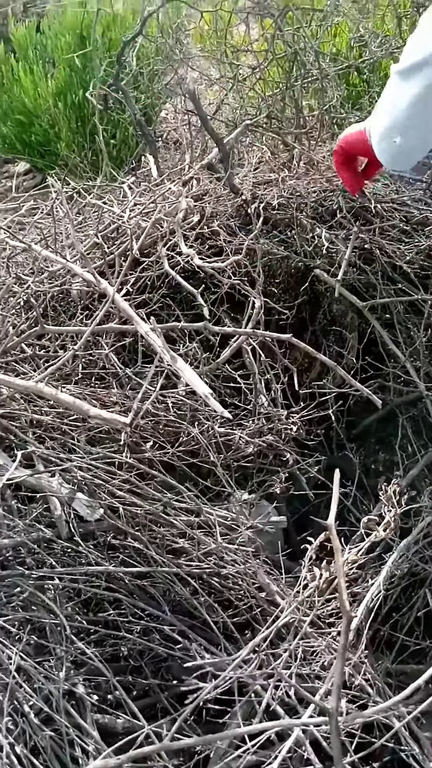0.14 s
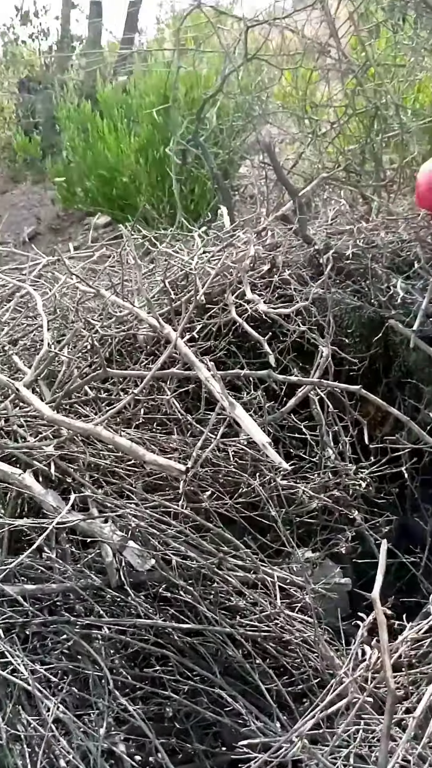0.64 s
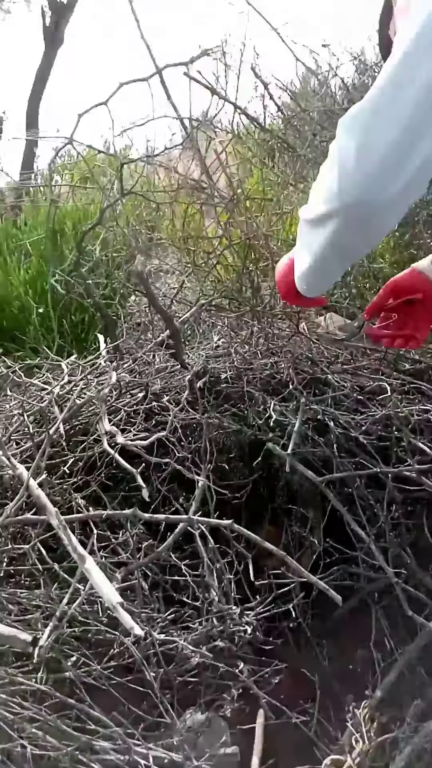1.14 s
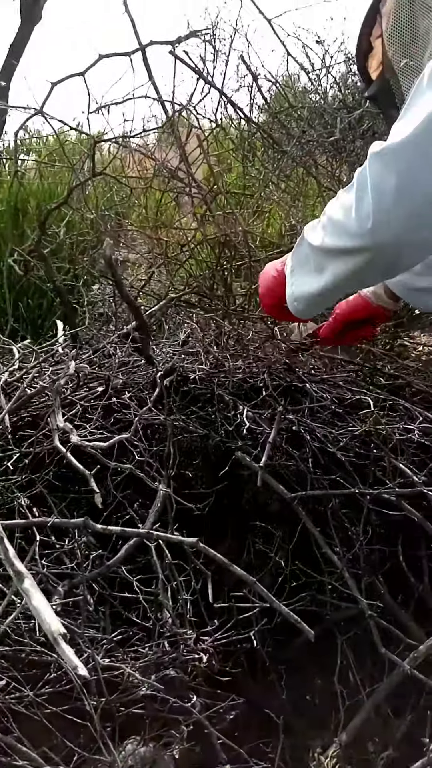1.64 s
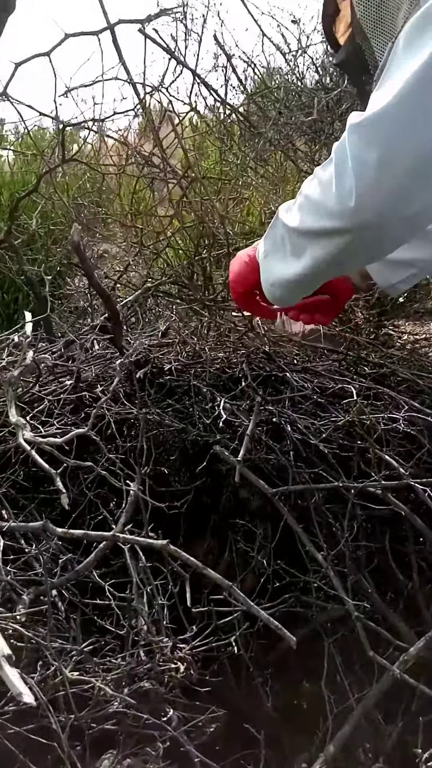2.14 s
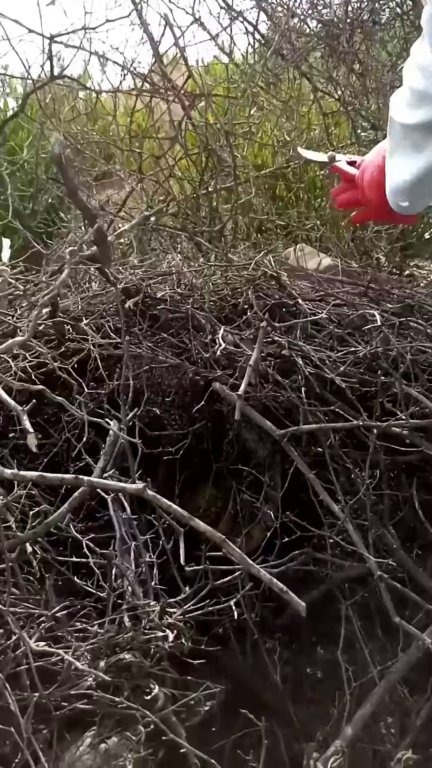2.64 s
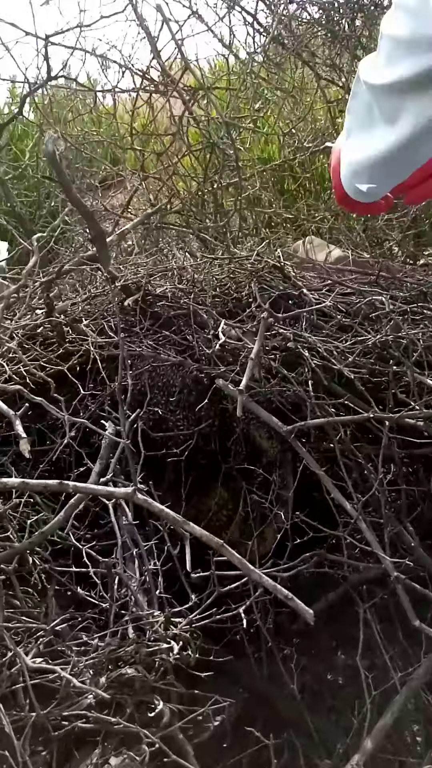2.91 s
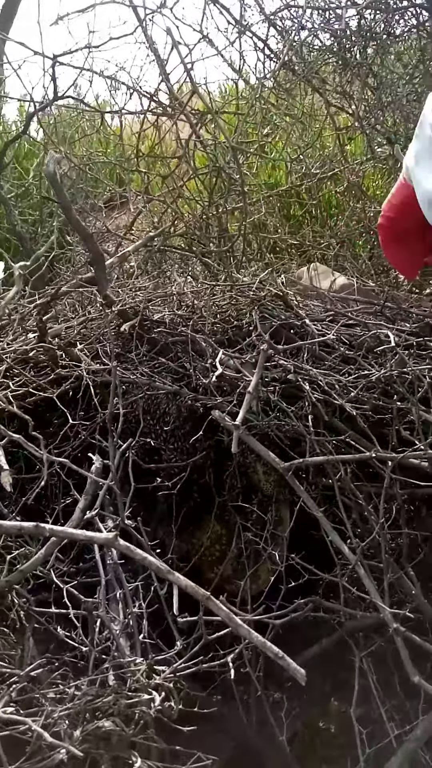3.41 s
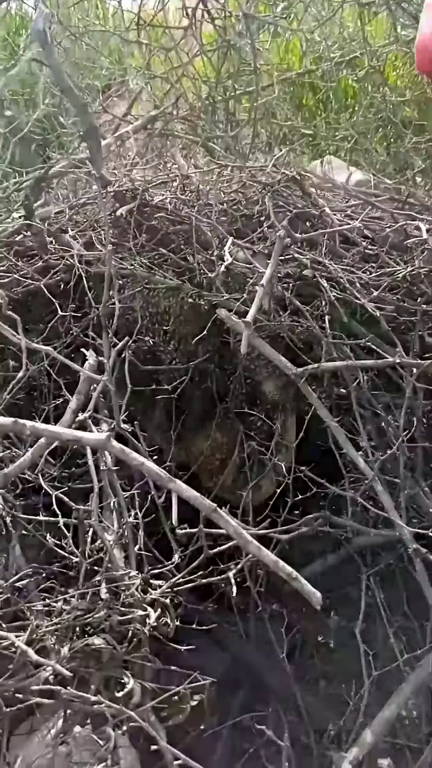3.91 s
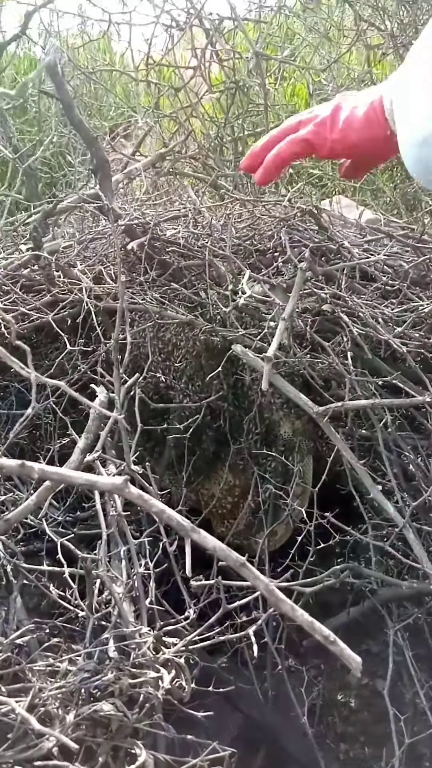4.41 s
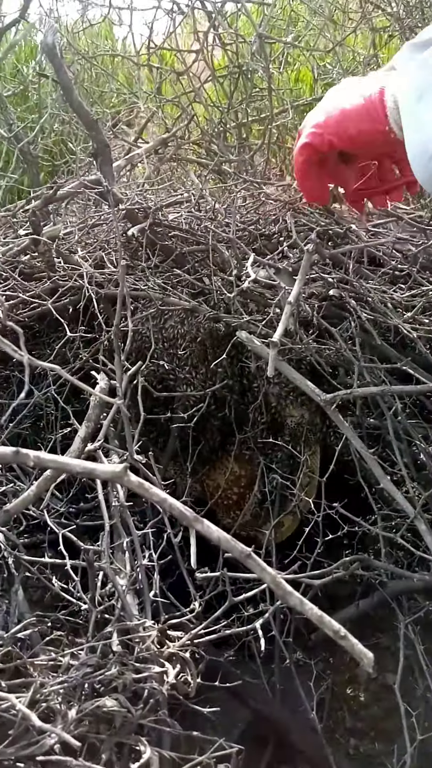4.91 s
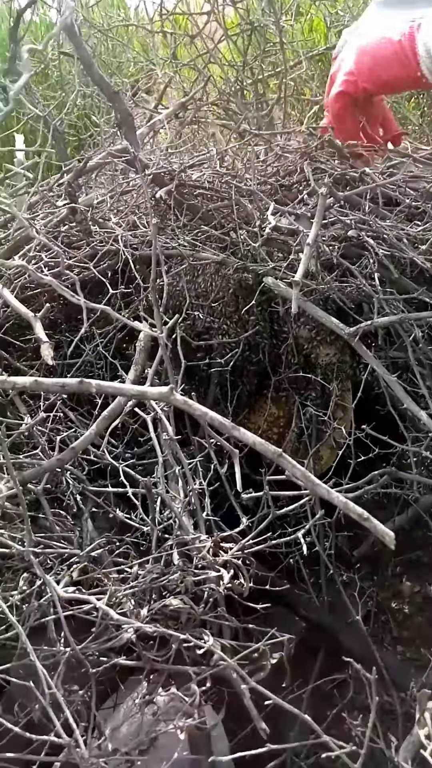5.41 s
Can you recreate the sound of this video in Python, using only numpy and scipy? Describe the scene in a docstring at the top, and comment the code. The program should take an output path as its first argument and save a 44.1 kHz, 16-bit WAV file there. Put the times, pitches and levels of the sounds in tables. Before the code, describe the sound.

Dry sticks rustle, tick and crack close up as a hand pushes through a brush pile, loud snaps clustering midway and later.

```python
"""A gloved hand pushes through a pile of dry twigs outdoors, close to a microphone, under a faint open-air hush.
First comes scraping bark and leaves (shaped noise) with small ticks, then a loose stick taps (fading sine tones).
From 1.3 s loud snaps join in, bursts of tearing-fibre noise that ring their twigs; the loudest comes near 1.57 s.
Crackling thickens after 2.2 s, strong snaps and knocks crowd together from 3.6 to 4.6 s, then all grows sparser.
The tangle scatters each snap; one overall colour lies on everything, with a steep drop near 16 kHz."""
import sys
import numpy as np
from scipy import signal
from scipy.fft import rfft, irfft
from scipy.io import wavfile
from scipy.ndimage import uniform_filter1d

SR = 44100
rng = np.random.default_rng(int(sys.argv[2]) if len(sys.argv) > 2 else 0)


def transcribe(u):
    """Save the signal u as a 16-bit wav file named by the first command-line argument.

    u: samples, shape (n,) or (channels, n), limited to [-1, 1]; the rate is SR.
    q: integer samples, one column per channel.
    """
    v = np.clip(np.atleast_2d(u).T, -1, 1)
    q = np.round(v * 32767).astype(np.int16)
    wavfile.write(sys.argv[1], SR, q)


def gain_from_decibels(decibels):
    """Convert decibel values to linear amplitude factors."""
    exponent = np.asarray(decibels, float) / 20
    return 10 ** exponent


N = 244755  # length in samples

# Open air before the overall colour, relative level: f/Hz, level/dB
AIR_COLOUR = [(25, 16.5), (70, 22), (200, 12.5), (400, 8), (800, -7.5), (1900, 8), (3200, -16.5),
              (6000, -16.5), (16000, -6)]
# The whole pile giving under the hand: start t/s, length/s, level/dB
HEAVES = [(0, 0.68, -76), (0.709, 0.14, -83), (1.39, 0.29, -77), (2.18, 0.53, -75.5), (3.453, 0.28, -69),
          (3.833, 1, -85.5)]
# A loose stick tapping faintly further off: t/s, level/dB
TAPS = [(.5, -80), (.63, -82.5), (.737, -77.5), (.953, -79.5)]
# The tones of that stick: f/Hz, level/dB added to the tap, damping per cycle
STICK_TONES = [(1316, 0, 0.12), (1880, 0, .12)]
# Thick branches knocking, each with its own ring: t/s, level/dB, f/Hz, damping per cycle
KNOCKS = [(.24, -71.5, 59, 3), (1.0878, -47.5, 500, 3), (1.3222, -48.5, 1170, 0.74), (1.568, -66, 170, 1.9),
          (1.567, -37, 1550, 0.56), (3.203, -63.5, 650, 0.52), (3.6533, -43.5, 1160, 0.39),
          (3.6668, -51, 1140, 0.35), (3.683, -61, 1210, .3), (3.8225, -52, 413, 1.9),
          (4.161, -63, 553, 0.38), (4.162, -69, 228, 1.5), (4.161, -46, 1466, 0.22), (4.412, -60, 654, 1.2),
          (4.413, -68.5, 275, 1.2), (4.413, -47, 1596, 0.31), (4.412, -37.5, 2310, 0.23),
          (4.627, -68, 267, 2), (4.625, -48.5, 1613, 0.23), (5.431, -86.5, 200, 0.21)]
# The hand dragging through the pile, before the wood colours it: t/s, level/dB
SCRAPE = [(0, -62.5), (.106, -57.5), (.269, -67), (.332, -56), (.365, -58), (.404, -70.5), (.7, -74),
          (.741, -62), (.82, -65.5), (.913, -79.5), (1.13, -79), (1.242, -58.5), (1.353, -65.5), (1.5, -55),
          (1.678, -69), (1.75, -65.5), (1.951, -86), (1.973, -59), (2.015, -52), (2.237, -62), (2.48, -62),
          (2.767, -72.5), (2.87, -70.5), (3.17, -71.5), (3.348, -76), (3.507, -63.5), (3.6, -51),
          (3.7, -58.5), (3.81, -63.5), (3.87, -69), (3.984, -67), (4.13, -58.5), (4.22, -66.5), (4.3, -54),
          (4.47, -70), (4.53, -63), (4.63, -66), (4.704, -72), (4.78, -69), (4.83, -65.5), (4.94, -70),
          (4.98, -63), (5.05, -60.5), (5.12, -70.5), (5.2, -67), (5.549, -64.5)]
# The wood under the hand as it moves about: t/s, thickness/dB of body, brittleness/dB of treble
WOOD = [(0, 0.5, 1.5), (.4, 5, 2.5), (.65, -10.5, -7), (.9, 1.5, -1), (1.2, 0, -8.5), (1.45, 1.5, -8.5),
        (1.999, -2, -2), (2.5, 8, -0.5), (3.1, -0.5, 1), (3.5, 14, 4.5), (3.57, 4.5, 9), (3.63, 19, 9),
        (3.72, 7.5, 6.5), (3.95, 11, 8), (4.2, -1.5, -1), (4.35, -5, -2.5), (4.7, 4.5, -2.5),
        (5.549, 8, 7.5)]
# How readily the wood crackles, making ticks denser and stronger: t/s, level/dB
CRACKLE = [(0, -1), (.3, -8), (.55, -14), (1.2, -14), (1.6, -12), (2.05, -14), (2.2, 4), (2.7, 5), (3.4, 6),
           (3.65, -8), (4.0, 5), (4.6, 5), (4.95, -8), (5.549, -6)]
# Rings of the small ticks, before slight detuning: f/Hz
TICK_RINGS = [1350, 2100, 5300, 6940, 9100]
# The clear snaps: t/s, level/dB (energy as if over 1 ms), ring f/Hz, thickness/dB of body, break length/ms
SNAPS = [(0.0545, -49, 1210, 0, 2.37), (0.0735, -41, 5000, 5, 0.2), (0.092, -45, 6060, 3, 1.9),
         (.1037, -50, 8450, -3, .39), (0.1141, -45, 1140, -6, 1.4), (0.172, -44, 10400, -12, 0.68),
         (0.1793, -44.5, 1090, 3, 7.5), (0.199, -48, 1200, 5, 5.9), (0.2418, -45.5, 5970, -2, 1.3),
         (.2583, -50.5, 1460, 13, 0.14), (0.3528, -55, 1800, 2, 1.9), (0.44, -49.5, 1330, -3, 6.7),
         (0.503, -57, 1470, 34, 3.9), (0.729, -48, 4630, -28, 3), (0.8503, -45.5, 6640, -26, 2.6),
         (1.0874, -36, 1460, -0.5, 0.23), (1.266, -44, 2100, -6, 3.4), (1.3215, -24.5, 1840, 5, 0.5),
         (1.327, -43.5, 2020, -13, 0.87), (1.3978, -39.5, 2100, 6, 0.21), (1.417, -45, 2090, 0, 1.9),
         (1.4252, -48, 1040, 17, 1.1), (1.479, -49.5, 5100, -18, 0.93), (1.4999, -33, 5450, 0.5, 1.4),
         (1.512, -32.5, 7000, 0.5, 1.3), (1.5422, -40.5, 5300, -17, .36), (1.5494, -29.5, 5200, 11.5, 5.9),
         (1.5663, -14, 5820, -24, 0.48), (1.9635, -45.5, 5080, 6.5, 6.6), (2.06, -54, 5580, -8, 1.4),
         (2.1621, -56, 9300, -10, .81), (2.1701, -41, 5300, -5, 1), (2.178, -50, 5400, -8, .6),
         (2.2133, -37.5, 4840, -8, 0.92), (2.2458, -43.5, 2150, -6, 0.9), (2.2656, -42, 9400, -14, 0.19),
         (2.2798, -24.5, 9630, -5.5, 1.15), (2.293, -37.5, 5500, 5, 1.4), (2.3344, -35, 5950, 5.5, 5.7),
         (2.3738, -33, 5200, 1, 0.57), (2.393, -49, 5710, 3, 0.61), (2.4179, -44, 4950, 5, 0.25),
         (2.4317, -52, 2200, -7, .8), (2.4615, -45, 2170, -8, .43), (2.4697, -42, 2090, -12, 0.35),
         (2.4905, -41, 5130, 1, 0.23), (2.5089, -42.5, 3020, 1, 0.31), (2.5144, -39.5, 1720, 0, 0.12),
         (2.5607, -50, 9600, -1, .31), (2.5704, -56, 2670, 1, 0.61), (2.608, -42.5, 1880, -5.5, 0.63),
         (2.6575, -49, 1820, 1, 1.3), (2.6912, -50.5, 2880, 10, 0.2), (2.7091, -47, 3320, 1, 4),
         (2.7598, -54, 2150, -10, 0.23), (2.8033, -62, 2190, 9, 0.65), (2.8555, -51, 1980, -10, 3.6),
         (2.8682, -49.5, 5300, -16, 2.2), (2.923, -44.5, 4480, -17, 0.85), (3.0343, -47.5, 9100, -3, 0.49),
         (3.141, -52, 5100, -11, 1), (3.195, -50, 8800, -3, 0.39), (3.2028, -28, 2450, -7.5, 0.95),
         (3.2275, -48, 4930, -13, 3.3), (3.2738, -49, 8400, -5, 0.61), (3.3229, -49, 2040, -10, 2.3),
         (3.4159, -51, 6900, 10, 0.5), (3.4659, -43, 1830, 20, 0.39), (3.5078, -42.5, 7300, 11, 0.49),
         (3.5743, -18, 8060, -5.5, 0.29), (3.5877, -30.5, 9200, -18, .32), (3.6438, -32.5, 2260, 0, 1.4),
         (3.7023, -44, 4700, -12, .38), (3.8227, -27, 1880, 0.5, 0.43), (3.868, -39.5, 1890, -1, 1.5),
         (3.8899, -24.5, 1330, 5, 2.46), (3.9258, -31, 1460, 22, 2.2), (3.93, -32.5, 1740, -2, 2.8),
         (3.9368, -31, 1840, 16, 3), (4.0165, -44, 7620, -4, 0.62), (4.0381, -43, 2320, 1, 0.27),
         (4.051, -40, 1890, 12, 0.33), (4.0637, -43.5, 2780, -22, 0.73), (4.08, -54, 9260, -9, .51),
         (4.0994, -26, 8950, -16, 0.11), (4.1132, -44, 9650, -18, 0.38), (4.1478, -36.5, 2100, 5, 2.8),
         (4.1588, -19.5, 2230, -9.5, 2.44), (4.2042, -36.5, 5230, -17, .37), (4.2298, -44, 7840, -2, 1.2),
         (4.2883, -37, 6740, -12, 1.6), (4.2933, -41.5, 7700, -7, 0.98), (4.305, -49, 1320, -2, 2.4),
         (4.3223, -36, 2200, 3.5, 0.76), (4.3948, -41.5, 2260, 10, 3.4), (4.4102, -22.5, 5050, -8, 1.8),
         (4.448, -40, 7350, -6, 1.5), (4.4992, -37, 8500, -7, 0.06), (4.5143, -42.5, 1750, -6.5, 2),
         (4.5659, -44.5, 5100, 2, 1.4), (4.5723, -53, 1570, 7, 1.7), (4.5924, -47, 1540, 6, 6.3),
         (4.6219, -32, 7410, -8, 2.1), (4.6266, -28.5, 1870, -2.5, 1.7), (4.77, -49.5, 1880, -19, 4.1),
         (4.8307, -42, 1660, 3, 10.3), (4.9652, -42.5, 2170, -8, 3.8), (5.0397, -42.5, 7400, 6, 1.8),
         (5.188, -41, 5100, 0, 1.2), (5.24, -39, 2000, 18, 0.89), (5.4108, -41.5, 7400, 4, 2.3)]
# Scatter among the branches: f/Hz, time to die by 60 dB t/s
TANGLE = [(500, 0.036), (1800, 0.03), (5000, 0.017), (15000, 0.053)]
# Overall colour of the finished sound, with a steep drop near 16 kHz, relative level: f/Hz, level/dB
OVERALL = [(30, -25.5), (300, -13), (800, -3.5), (1300, -8.5), (2350, -4.5), (2800, -6), (3650, -5.5),
           (4700, 0.5), (6100, -1.5), (7300, -2), (9500, -8), (12800, -19.5), (15300, -6.5), (15900, 0),
           (16150, -54)]

HZ = np.fft.rfftfreq(2048, 1 / SR)  # frequencies at which the filters are drawn
AIR_DB = -74
HEAVE_HZ = (120, 447)  # band of the pile shifting on the ground
BODY_HZ, MIDDLE_HZ, TREBLE_HZ = 2400, 4700, 10830
# noise just before (rise) and after (shiver) a snap of -34.5 dB; the share says how far it follows the snap
SHIVER_DB, RISE_DB, SNAP_SHARE = -64, -63.5, 0.78
SHIVER_S, RISE_S = 0.022, 0.0043  # times for the power to change by a factor e
TICK_OVER_DB, TICK_SPREAD_DB = 8.5, 4.5  # level over the scrape, and its scatter
TICK_CROWDING = 0.4  # how much ticks gather where the scrape is loud
TICK_BRIGHT_DB = 8  # most extra treble a tick can get at random
# a break is brighter than the rub, a strong one less so (dB per dB over -44.5)
SNAP_BRITTLE_DB, LOUD_DULL = 5.5, 0.22
PATCH_OVER_DB = -75  # the one-sided treble patches are silent where the scrape level is below this


def evened(x):
    """Scales to an average strength (rms) of 1."""
    return x / np.sqrt(np.mean(abs(x) ** 2) + 1e-20)


def read(points, hz):
    """Reads a curve between its points on a log-frequency axis."""
    f, value = np.transpose(points)
    return np.interp(np.log(hz + 1), np.log(f + 1), value)


def at_time(points, t):
    """Reads a two-column table between its points in time."""
    return np.interp(t, *np.transpose(points))


def add(mix, s, sound):
    """Mixes a sound in at time s."""
    part = mix[round(s * SR):][:len(sound)]
    part += sound[:len(part)]


def causal(db):
    """Turns levels in dB on HZ into a filter that acts as promptly as possible (minimum phase)."""
    log_gain = np.log(gain_from_decibels(np.concatenate([db, db[-2:0:-1]])))
    return np.exp(np.conj(signal.hilbert(log_gain)))[:len(db)]


def mode(hz, width_hz):
    """One resonance on HZ, of gain 1 at its peak, that rings only after it is struck."""
    return 1 / (1 + 1j * hz / width_hz * (HZ / hz - hz / (HZ + 1)))


def split(x):
    """Splits a sound into frequencies and short time frames."""
    return signal.stft(x, SR, nperseg=256, noverlap=192)


def join(z):
    """Joins the frames back into a sound."""
    return signal.istft(z, SR, nperseg=256, noverlap=192)[1][:N]


def shaped(x, db):
    """Colours a sound by a level field over frequency and time, db(hz, s)."""
    hz, t, z = split(x)
    return join(z * gain_from_decibels(db(hz[:, None], t)))


def random_patches(bins, frames):
    """Smoothed random values over frequency and time, making patches of the given size."""
    grid = rng.standard_normal((129, N // 64 + 9))
    return evened(uniform_filter1d(uniform_filter1d(grid, bins, axis=0), frames, axis=1))


def wood(hz, thick_db, brittle_db):
    """Thick wood adds body, thin dry wood adds treble; no twig is big enough to radiate bass."""
    body = read([(BODY_HZ, 1), (MIDDLE_HZ, 0)], hz)
    treble = read([(MIDDLE_HZ, 0), (TREBLE_HZ, 1)], hz)
    little_bass_db = read([(100, -45), (500, -27.5), (900, -11.5), (1200, -2.5)], hz)
    return body * thick_db + treble * brittle_db + little_bass_db


def air():
    """A faint outdoor hush of noise whose colour drifts in uneven patches."""
    patches = random_patches(2, 60)
    colour = irfft(causal(read(AIR_COLOUR, HZ)))
    hush = evened(signal.oaconvolve(rng.standard_normal(N), colour)[:N])
    return gain_from_decibels(AIR_DB) * shaped(hush, lambda hz, t: 1.8 * patches[:, :len(t)])


def heave():
    """A soft lumpy low rumble that swells and fades with each shift of the pile."""
    band = signal.butter(2, HEAVE_HZ, "bandpass", fs=SR, output="sos")
    low = signal.sosfilt(band, rng.standard_normal(N))
    lumps = gain_from_decibels(3 * evened(uniform_filter1d(rng.standard_normal(N), 1500)))
    swell = np.zeros(N)
    for s, length, db in HEAVES:
        add(swell, s, gain_from_decibels(db) * np.sin(np.pi * np.arange(0, length, 1 / SR) / length))
    return swell * lumps * evened(low)


def struck(db, hz, damping):
    """A struck stick swings at its own pitch; more damping means fewer swings."""
    t = np.arange(4000) / SR
    fade = damping * hz * t
    level = gain_from_decibels(db - read(OVERALL, hz))  # makes up beforehand for the overall colour
    return level * np.sin(2 * np.pi * hz * t) * np.sqrt(fade) * np.exp(1 - fade)


def taps():
    """Each tap of the loose stick sets off all of its tones."""
    out = np.zeros(N)
    for s, db in TAPS:
        for hz, tone_db, damping in STICK_TONES:
            add(out, s, struck(db + tone_db, hz, damping))
    return out


def knocks():
    """A thick branch gives a swing or two; a loose one rings on a little."""
    out = np.zeros(N)
    for s, db, hz, damping in KNOCKS:
        add(out, s, struck(db, hz, damping))
    return out


def stirring():
    """Strength of the noise: the hand's drag, a brief rise just before each snap, its neighbours' shiver after."""
    power = gain_from_decibels(2 * at_time(SCRAPE, np.arange(N) / SR))
    after = np.arange(SR // 4) / SR
    before = after[:SR // 20]
    for s, db, *_ in SNAPS:
        size_db = SNAP_SHARE * (db + 34.5)
        add(power, s, gain_from_decibels(2 * (SHIVER_DB + size_db)) * np.exp(-after / SHIVER_S))
        rise = gain_from_decibels(2 * (RISE_DB + size_db)) * np.exp(-before[::-1] / RISE_S)
        add(power, s - len(before) / SR, rise)
    return np.sqrt(power)


def scrape():
    """Bark and leaves rubbing: hiss with clumps of tiny clicks, in shifting patches of colour."""
    s, thick_db, brittle_db = np.transpose(WOOD)
    clumps = gain_from_decibels(1.1 * evened(uniform_filter1d(rng.standard_normal(N), 300)))
    chance = rng.random(N) < 700 / SR  # about 700 clicks a second
    clicks = gain_from_decibels(1.1 * np.minimum(rng.exponential(1, N), 3)) * chance
    clicks = signal.oaconvolve(clicks, np.exp(-np.arange(80) / 14))[:N] * rng.standard_normal(N)
    rub = evened(clumps * (rng.standard_normal(N) + 0.64 * evened(clicks)))
    patches = random_patches(3, 18)

    def field(hz, t):
        """Level in dB from the wood, the ground and the patches."""
        # the ground echo cancels a band of the low-lying rustle
        hollow_db = -5 * np.exp(-((hz - 3300) / 600) ** 2)
        colour_db = wood(hz, np.interp(t, s, thick_db), np.interp(t, s, brittle_db))
        return colour_db + hollow_db + 4.3 * patches[:, :len(t)]

    return stirring() * shaped(rub, field)


def ticks(count=220):
    """Rows like SNAPS for small chance ticks, thickest where the hand drags hard and the wood crackles."""
    t = np.arange(0, N / SR - 0.05, 0.001)
    level_db = at_time(SCRAPE, t)
    share = np.cumsum(gain_from_decibels(TICK_CROWDING * level_db + at_time(CRACKLE, t)))
    place, size, ring, detune, thick, length = rng.random((count, 6)).T
    s = np.interp(place, share / share[-1], t)
    db = np.interp(s, t, level_db) + 0.28 * at_time(CRACKLE, s) + TICK_OVER_DB
    db -= TICK_SPREAD_DB * np.log(size + 0.21)  # a few are much stronger
    hz = np.array(TICK_RINGS)[(ring * len(TICK_RINGS)).astype(int)] * (0.93 + 0.056 * detune)
    return list(zip(s + 0.004, db, hz, 20 * thick - 16, 0.2 * 5 ** length))


def tear(ring_hz, thick_db, brittle_db, length):
    """Spectrum of one break: a swelling and dying run of tearing fibres that rings its twig."""
    lead = 128  # samples of room for what the evening below spreads ahead of the break
    ms = np.maximum(np.arange(2048) - lead, 0) * 1000 / SR
    draw = rng.standard_normal(2048)
    fibres = draw * abs(draw) ** 0.97  # uneven: a few fibres part louder than the rest
    tearing = fibres * (ms / length) ** 0.87 * np.exp(-ms / (1.226 * length))
    z = rfft(tearing)
    z = z / np.sqrt(uniform_filter1d(abs(z) ** 2, size=50))  # a break pushes all frequencies alike
    width_hz = 60 + ring_hz / 30 + 250 / length
    # thick wood rings more; a clean quick break hardly rings, a slow one sings
    ring_db = 11.5 + 0.056 * max(thick_db, 0) + 1.5 * np.log(length)
    ring = 1 + gain_from_decibels(ring_db) * mode(ring_hz, width_hz)
    return z * causal(wood(HZ, thick_db, brittle_db)) * ring, lead


def snaps():
    """Breaks twigs at the listed times and adds the small ticks, each set to its level after the overall colour."""
    out = np.zeros(N)
    overall = evened(gain_from_decibels(read(OVERALL, HZ)))
    wood_s, _, wood_brittle_db = np.transpose(WOOD)
    for i, (s, db, ring_hz, thick_db, length) in enumerate(SNAPS + ticks()):
        brittle_db = np.interp(s, wood_s, wood_brittle_db) + SNAP_BRITTLE_DB
        brittle_db -= LOUD_DULL * (db + 44.5)
        if i >= len(SNAPS):  # ticks also get a random amount of extra treble
            brittle_db += TICK_BRIGHT_DB * rng.random()
        z, lead = tear(ring_hz, thick_db, brittle_db, length)
        heard = np.linalg.norm(irfft(z * overall))  # strength once coloured
        add(out, s - lead / SR, gain_from_decibels(db) * np.sqrt(SR / 1000) * irfft(z) / heard)
    return out


def tangle(x):
    """Short dense scatter off the branches, each band dying at its own speed."""
    hz, t, z = signal.stft(rng.standard_normal(6000), SR, nperseg=64)
    dying = gain_from_decibels(-60 * t / read(TANGLE, hz)[:, None])
    tail = signal.istft(z * dying, SR, nperseg=64)[1]
    return signal.oaconvolve(x, tail / np.linalg.norm(tail))[:N]


def side_patches(x):
    """Random patches of treble with scrambled phase, switched on and off, for the left-right difference."""
    hz, t, z = split(x)
    spells = evened(uniform_filter1d(rng.standard_normal(len(t)), 40))
    switched_on = (spells > -0.1) * (at_time(SCRAPE, t) > PATCH_OVER_DB)
    patches = random_patches(12, 22)[:, :len(t)] > 0.45
    scrambled = np.exp(2j * np.pi * rng.random(z.shape))
    return join(z * scrambled * switched_on * patches * (hz[:, None] > 4500))


def scene():
    """Both sides carry the same sound, except for patches of treble added to one and taken from the other."""
    direct = snaps() + knocks() + taps()
    pile = direct + gain_from_decibels(-9.0) * tangle(direct) + scrape() + heave()
    apart = gain_from_decibels(-2) * side_patches(pile)
    return pile + air() + np.array([apart, -apart])


def roll_off(x):
    """The treble ends steeply here."""
    return signal.sosfilt(signal.butter(12, 17110, fs=SR, output="sos"), x)


def record(dry):
    """Filters the whole mix with the overall colour: less bass, and a steep drop near 16 kHz."""
    colour = irfft(causal(read(OVERALL, HZ)))
    colour = colour / np.linalg.norm(colour)
    coloured = signal.oaconvolve(dry, colour[None], axes=1)[:, :N]
    return roll_off(coloured)


dry = scene()
out = record(dry)
transcribe(out)
```